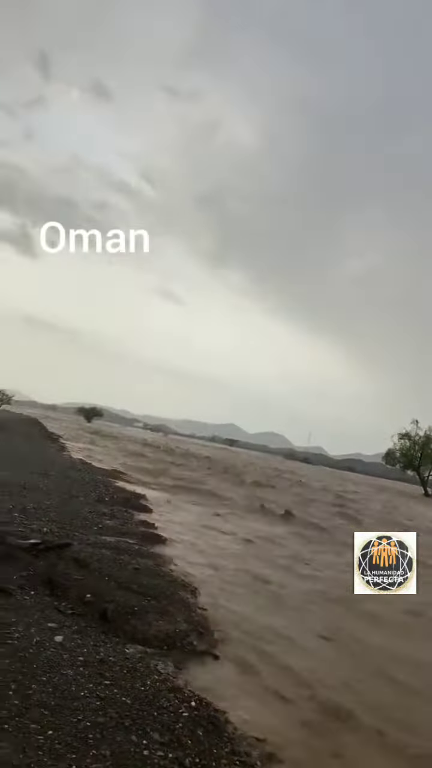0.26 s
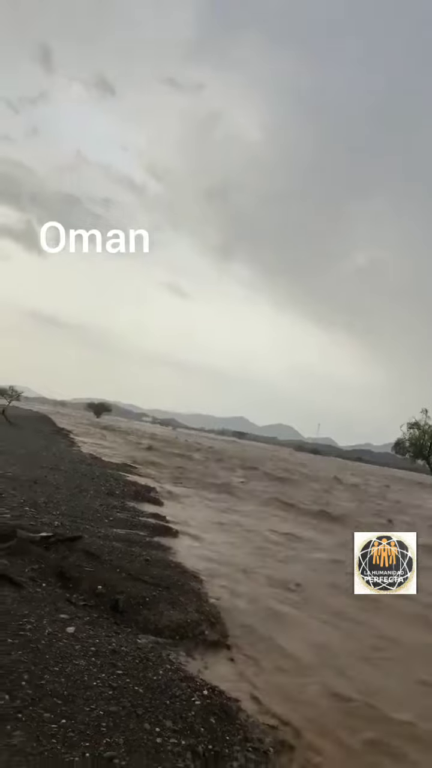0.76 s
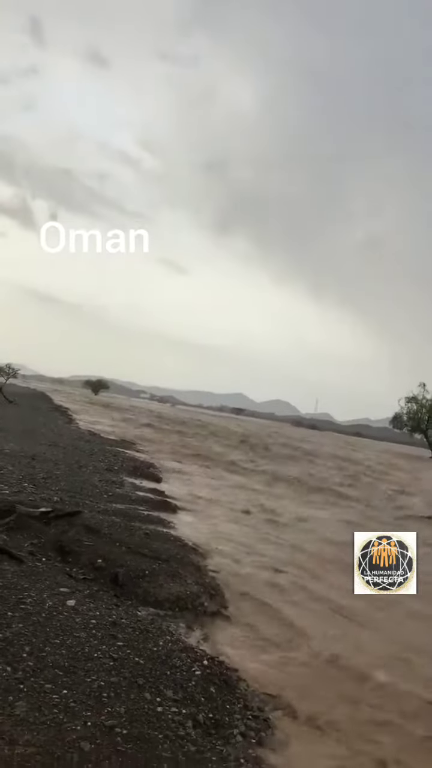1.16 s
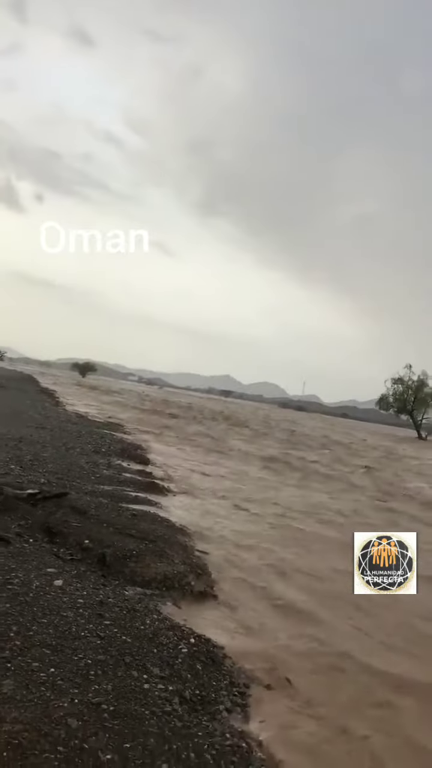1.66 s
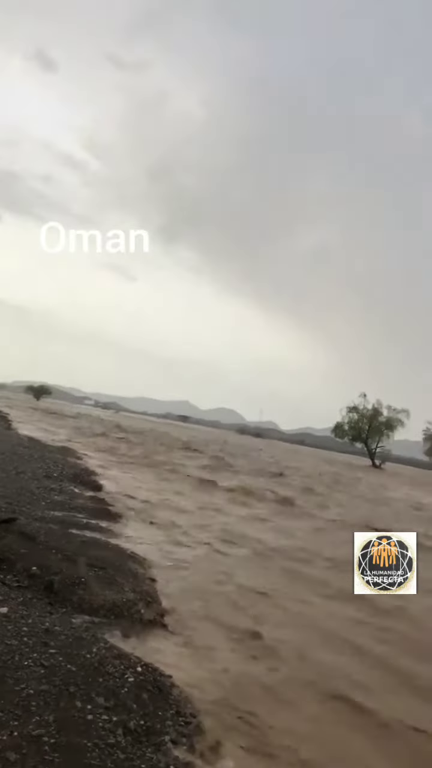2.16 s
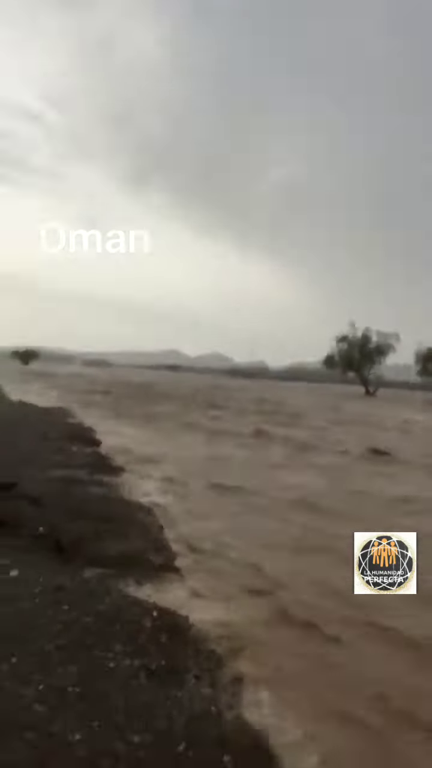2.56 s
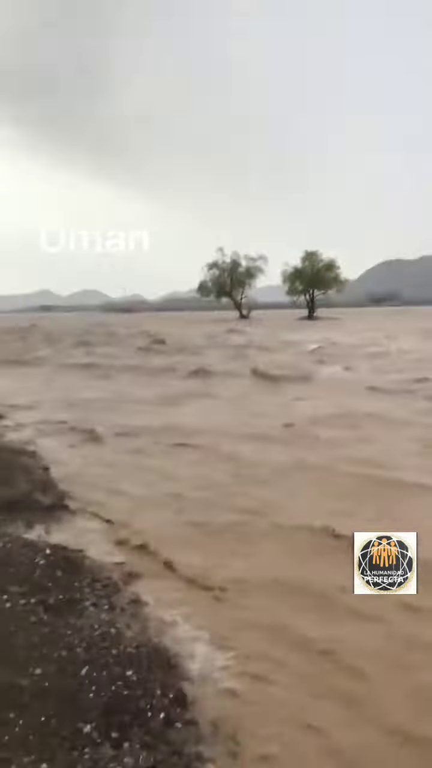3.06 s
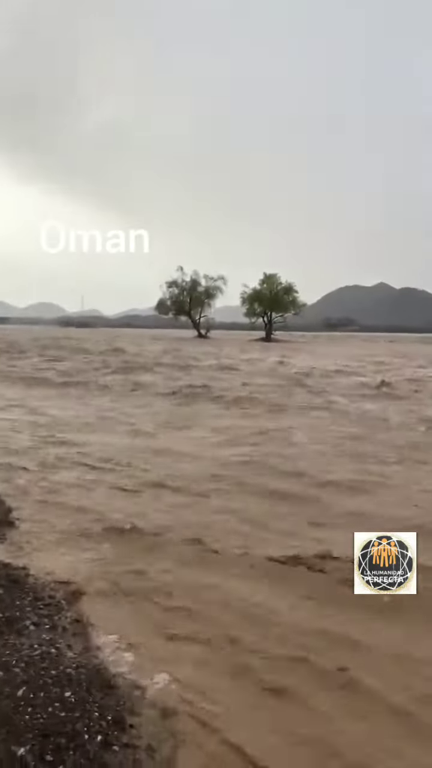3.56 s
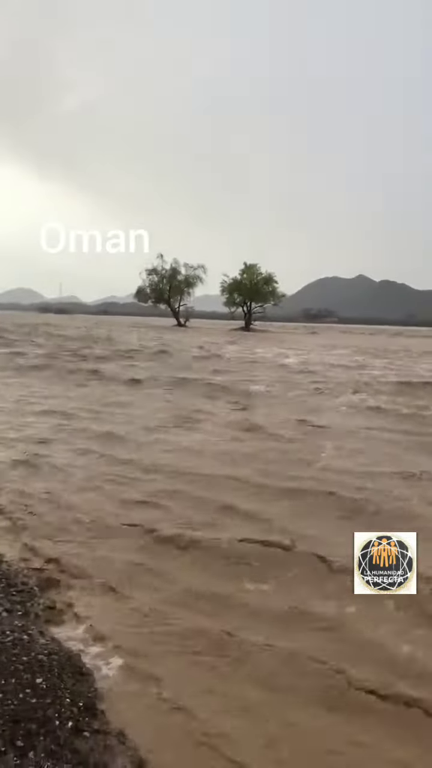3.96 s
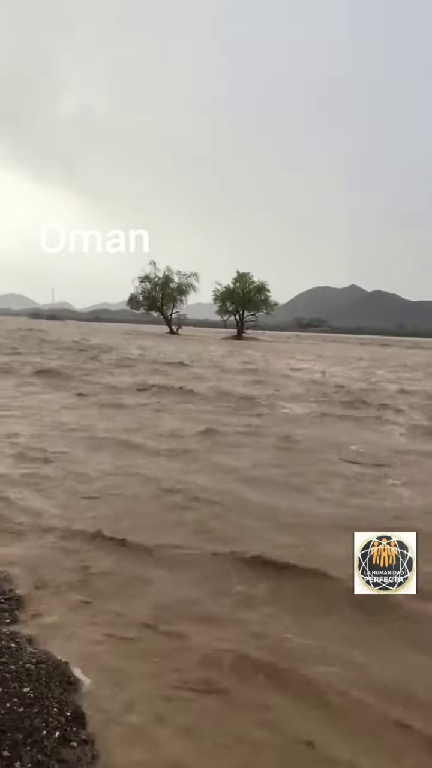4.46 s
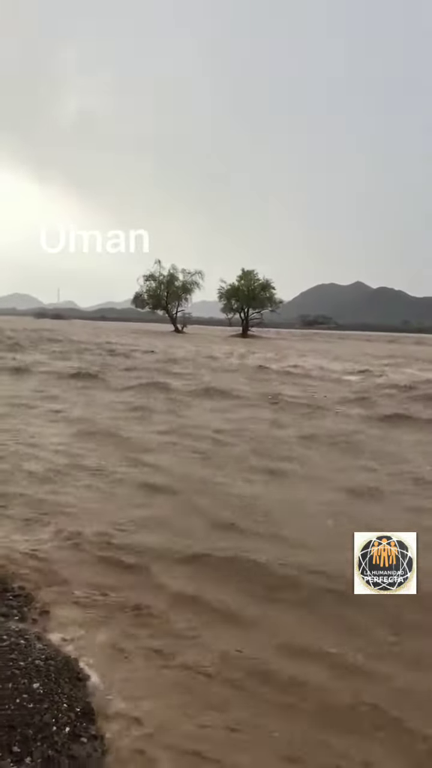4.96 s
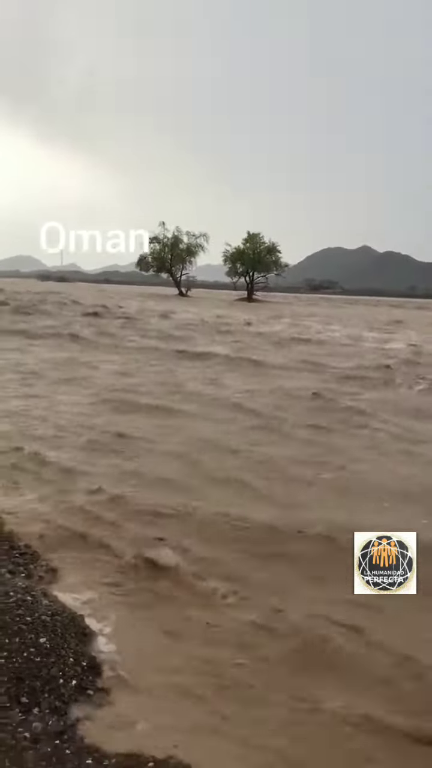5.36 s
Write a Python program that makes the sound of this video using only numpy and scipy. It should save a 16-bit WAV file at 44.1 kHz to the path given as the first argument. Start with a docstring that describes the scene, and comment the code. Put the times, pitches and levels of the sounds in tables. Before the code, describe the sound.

A flooded river rushes steadily from start to finish, heard from a phone on the gravel bank. Fine rain adds a soft, high hiss on the water and stones. For the first two seconds, gusts of wind buffet the microphone with a low rumble and a crackling flutter, strongest at the very start, at 0.5 seconds and around 1.5 seconds, before easing to a light breeze. Large raindrops hit the phone's case with short, sharp ticks and knocks at uneven intervals. They stand out at about 0.1, 0.2 and 1.3 seconds, then come in clusters near 2, 3 and 3.5 seconds and again between 4.7 and 5.4 seconds. A few drops land right on the microphone with a dull thud, loudest at about 3 and 4.7 seconds. The river and rain carry on until the end, at around 5.6 seconds.

```python
"""Gusts of wind and sharp taps of rain over a rushing, flooded river, heard from a phone on the bank.

The wind buffets the microphone for about two seconds, then eases to a breeze. Countless bursting bubbles
make the river's steady rush, and fine rain hisses on water and gravel. Drops hit the phone's case with
short ticks that fall in pitch, and a few land on the microphone opening with a thud."""
import sys
import numpy as np
from scipy import signal
from scipy.fft import rfft, irfft
from scipy.io import wavfile
from scipy.ndimage import uniform_filter1d

SR = 44100
rng = np.random.default_rng(int(sys.argv[2]) if len(sys.argv) > 2 else 0)


def dump(signal):
    """Clip the signal to [-1, 1] and save it as 16-bit WAV at the path in sys.argv[1]."""
    limited = np.clip(np.atleast_2d(signal).T, -1, 1)
    pcm = np.round(limited * 32767).astype(np.int16)
    wavfile.write(sys.argv[1], SR, pcm)


N = 247842
T = np.arange(N) / SR

# How strong the current, rain and wind are. Each row: time in seconds, relative level in dB.
CURRENT_LEVELS = [(2.3, -39), (4.58, -39), (4.81, -38.5), (5.62, -39)]
RAIN_LEVELS = [(0.0, -52), (0.87, -51.5), (1.31, -49.5), (2.83, -52.5), (5.62, -51.5)]
WIND_LEVELS = [(0.0, -27), (0.46, -38), (0.5, -26.5), (0.54, -37.5), (0.71, -36.5), (0.73, -30),
               (1.1, -35.5), (1.39, -27.5), (1.43, -34.5), (1.58, -29), (1.63, -27), (1.65, -40),
               (1.86, -35), (2.08, -37), (2.1, -36.5), (2.38, -38.5), (3.25, -42.5), (5.62, -41.5)]
# The tone of each noise. Each row: frequency in Hz, relative level in dB.
RIVER_TONE = [(150, -44), (300, -8.5), (420, -3), (560, 0.5), (680, 2), (820, -8), (1000, -18),
              (1250, -26.5), (1700, -18.5), (2100, -17), (2850, -18), (3300, -44), (4200, -33.5)]
RAIN_TONE = [(2000, -31), (3400, -5), (5000, -3), (6500, -1), (8500, 0.5), (10500, -0.5), (12500, -6),
             (15800, -12)]
RUMBLE_TONE = [(22, -27), (40, -6), (65, 3), (110, 0.5), (180, -3.5), (300, -10), (550, -23.5),
               (1000, -20.5), (2000, -65)]
FLUTTER_TONE = [(90, -21), (170, 7.5), (350, 1.5), (700, 1), (1000, -2.5), (1400, -9.5), (2000, -16.5),
                (3000, -34), (4000, -77)]
# Drops and swirls of air slapping the microphone opening.
# Each row: start in seconds, level in dB, starting pitch in Hz, fade time in seconds.
MIC_SLAPS = [(.234, -26, 390, 0.026), (.495, -16, 302, .009), (1.351, -17, 300, 0.012),
             (1.567, -21, 237, 0.029), (1.84, -20.5, 259, .008), (2.145, -15, 525, .021),
             (2.545, -20.5, 300, 0.0034), (2.9688, -7.5, 576, .019), (4.6568, -9, 387, 0.018)]
# Drops splashing on nearby water and gravel. Each row: start in seconds, level in dB.
NEAR_SPLASHES = [(.3957, -29.5), (.6009, -24), (1.175, -22), (3.27, -29)]
# The high notes the case rings at. Each row: pitch in Hz, level in dB, swell and fade time in seconds.
CASE_NOTES = [(966, -9, 0.002), (1576, -4.5, 0.00062), (2080, -4, 0.00063), (2714, -7.5, 0.00076)]
# Large drops on the case. Each row: start in seconds, level of the low body ring in dB, level of the
# tick in dB, brightness of the tick in dB per octave, place along the case from 0 to 1.
LARGE_DROPS = [(.0923, -13.5, -13, -1, .23), (.1014, -3, -13.5, -2, 0.28), (.2324, -11, -0.5, 1, 0.4),
               (.421, -26.5, -38, 5, 0.5), (.6009, -55, -20, 8, 0.26), (.772, -26, -30, 5, .38),
               (1.2274, -25.5, -29, 10, .38), (1.3052, -16.5, -2.5, 1.5, .4), (1.426, -21, -40, -3, .3),
               (1.4962, -24, -54, -3, .3), (1.8554, -41, -22.5, 2, .38), (1.902, -17.5, -16, -4, 0.42),
               (2.0248, -27, -24.5, -6, .4), (2.1265, -15.5, -17.5, 8, 0.43), (2.144, -9.5, -31, 0, 0.14),
               (2.1505, -19, -38, 1, 0.6), (2.287, -30, -36, -2, 0.2), (2.489, -47, -25.5, 6, 0.21),
               (2.8537, -8.5, -9.5, -3, 0.18), (2.9683, -40, -15, 9, 0.14), (2.973, -18, -16, 4, 0.24),
               (3.0365, -23.5, -20, 10, 0.29), (3.0731, -15.5, -12, 6, .18), (3.5115, -21.5, -28, 8, 0.46),
               (3.5217, -25, -26, -6, 0.23), (3.5709, -12.5, -17, 16.5, .37), (3.6176, -21, -21, 20, .5),
               (4.0512, -20.5, -27.5, 1, .38), (4.6564, -20, -30, -14, .5), (4.679, -17.5, -19, -1, 0.17),
               (4.84, -18, -38, 9, .36), (4.9722, -35, -19, 11, 0.26), (4.9878, -5.5, -10, 2, 0.42),
               (5.3253, -28, -25, 8, 0.42), (5.354, -28.5, -35, 5, .36), (5.3761, -34, -16.5, 10, 0.37)]


def undb(db):
    """Turn decibels into a number to multiply a sound by."""
    return 10 ** (np.asarray(db) / 20)


def unit(x):
    """Scale a signal so its average strength (rms) is 1."""
    return x / np.sqrt(np.mean(x ** 2))


def curve(rows):
    """Join (seconds, value) rows with straight lines."""
    return np.interp(T, *np.transpose(rows))


def colour(x, tone):
    """Shape a sound with a tone table, fading beyond the table's ends; the result has strength 1."""
    hz, db = np.transpose(tone)
    f = np.maximum(np.arange(N // 2 + 1) * SR / N, 1)
    edge_fade = np.minimum(f / hz[0], 1) ** 2 * np.minimum(hz[-1] / f, 1) ** 2
    gain = undb(np.interp(np.log(f), np.log(hz), db))
    return unit(irfft(rfft(x) * edge_fade * gain, N))


def band(x, low_hz, high_hz):
    """Keep mainly the sound between two frequencies."""
    return signal.sosfilt(signal.butter(2, [low_hz, high_hz], "band", fs=SR, output="sos"), x)


def wander(rate):
    """A smooth random wobble of strength 1 that picks a new value `rate` times a second."""
    steps = rng.standard_normal(4096)[(T * rate).astype(int) % 4096]
    width = int(SR / rate)
    return unit(uniform_filter1d(uniform_filter1d(steps, width), width))


def patter(rate, spread_db):
    """About `rate` random clicks a second, many small and a few large."""
    hit = rng.random(N) < rate / SR
    size = undb(spread_db * np.minimum(rng.exponential(size=N), 5))
    return unit(hit * size * rng.choice([-1, 1], N))


def glide(t, start_hz, end_hz, glide_s):
    """A pure tone that slides from one pitch toward another."""
    hz = end_hz + (start_hz - end_hz) * np.exp(-t / glide_s)
    return np.sin(2 * np.pi * np.cumsum(hz) / SR)


def chirp(start_hz, end_hz, glide_s, swell_s):
    """A ring that swells, fades and falls in pitch: high vibrations arrive before low ones."""
    t = np.arange(SR // 30) / SR
    return t / swell_s * np.exp(1 - t / swell_s) * glide(t, start_hz, end_hz, glide_s)


def add(out, start, sound):
    """Mix a sound into `out` at `start` seconds."""
    i = int(start * SR)
    out[i:i + len(sound)] += sound[:N - i]


def river():
    """Countless bursting bubbles merge into a rush that surges gently with the current."""
    bubbles = rng.standard_normal(N) + 0.44 * patter(rate=1800, spread_db=5)
    level_db = curve(CURRENT_LEVELS) + 2 + 0.94 * wander(rate=10)
    return colour(bubbles, RIVER_TONE) * undb(level_db)


def rain():
    """Fine drops on water and gravel: a distant hiss, and nearer specks that each have their own pitch."""
    hiss = colour(rng.standard_normal(N) + 0.38 * patter(rate=2600, spread_db=10), RAIN_TONE)
    specks = np.zeros(N)
    t = np.arange(SR // 200) / SR
    for when, pitch, faintness in rng.random(size=(700, 3)):
        hz = 4500 + 9000 * pitch
        ping = np.sin(2 * np.pi * hz * t) * np.exp(-t / 0.00095)
        add(specks, when * N / SR, (faintness + 0.045) ** -0.6 * ping)
    level_db = curve(RAIN_LEVELS) + 0.43 + 0.55 * wander(rate=8.8)
    return (hiss + undb(-13.5) * colour(specks, RAIN_TONE)) * undb(level_db)


def wind():
    """Swirling air rumbles on the microphone; strong gusts break into a brighter, crackling flutter."""
    gust_db = curve(WIND_LEVELS)
    rumble = colour(rng.standard_normal(N), RUMBLE_TONE) * undb(gust_db - 0.5 + 2 * wander(rate=55))
    # the flutter follows the wind more slowly and stops growing at a full gust
    slow_gust_db = uniform_filter1d(gust_db, int(0.2 * SR))
    full_gust_db = -34.5
    flutter_db = -35 + 2.63 * np.minimum(slow_gust_db - full_gust_db, 0)
    swirls = rng.standard_normal(N) + 0.88 * patter(rate=240, spread_db=3.5)
    flutter = colour(swirls, FLUTTER_TONE) * undb(flutter_db + 3.3 * wander(rate=45))
    return rumble + flutter


def thuds():
    """Water spreads over the microphone opening, so its ring sinks into the bass over a brief slosh."""
    out = np.zeros(N)
    t = np.arange(SR // 6) / SR
    fade_in = 1 - np.exp(-t / 0.00037)
    for start, db, hz, fade_s in MIC_SLAPS:
        slap = glide(t, start_hz=hz, end_hz=60.7, glide_s=0.00463) * np.exp(-t / fade_s)
        slosh = unit(band(rng.standard_normal(len(t)), low_hz=60, high_hz=463)) * np.exp(-t / 0.024)
        add(out, start, undb(db) * fade_in * (slap + undb(-14) * slosh))
    return out


def spray():
    """A sharp crack that falls in pitch at the very start of a hit, and a very short fizz of droplets."""
    crack = chirp(start_hz=9100, end_hz=4400, glide_s=0.00005, swell_s=0.00005)
    t = np.arange(len(crack)) / SR
    fizz = rng.standard_normal(len(t)) * np.exp(-t / 0.00034)
    return crack + undb(3.5) * fizz


def case_knock(body_db, tick_db, bright_db, place, body_hz):
    """One drop hits the case: a tick of high notes, the falling ring of the body and a dull push."""
    body = chirp(start_hz=1542, end_hz=body_hz, glide_s=0.0012, swell_s=0.0017)
    push = chirp(start_hz=360, end_hz=267, glide_s=0.0052, swell_s=0.001)
    lag_s = 0.00047  # the body's slow wave arrives after the tick
    knock = np.roll(undb(body_db) * (body + undb(-13.5) * push), int(lag_s * SR))
    for number, (hz, db, swell_s) in enumerate(CASE_NOTES, 1):
        # a harder hit favours the high notes
        gain = undb(tick_db + db + bright_db * np.log2(hz / 2200))
        # each note has still spots on the case, where a hit cannot sound it
        movement = abs(np.sin(np.pi * number * place))
        knock += gain * movement * chirp(1.27 * hz, hz, swell_s, swell_s)
    return knock


def drops():
    """Large drops and a sprinkle of small ones knock on the case and shatter; a few splash nearby."""
    knocks, sprays = np.zeros(N), np.zeros(N)
    for start, body_db, tick_db, bright_db, place in LARGE_DROPS:
        # the heavier the drop, the lower the body's pitch settles
        knock = case_knock(body_db, tick_db, bright_db, place, body_hz=551 - 2 * body_db)
        add(knocks, start, knock)
        # a piece of the drop lands again a moment later
        add(knocks, start + 0.00293 + 0.0051 * rng.random(), undb(-25) * knock)
        # fast, hard drops throw more spray
        spray_db = -9 + 2.06 * tick_db + 0.84 * bright_db
        add(sprays, start, undb(spray_db) * spray())
    for start, db in NEAR_SPLASHES:
        add(sprays, start, undb(db) * spray())
    for when, weight, hardness, place, pitch, wetness in rng.random(size=(50, 6)):
        start = when * N / SR
        small = case_knock(body_db=-47.5, tick_db=-39, bright_db=13 * hardness - 9.5,
                           place=place, body_hz=550 + 400 * pitch)
        # the fourth power keeps most small drops faint and lets a few stand out
        add(knocks, start, undb(6 * weight ** 4) * small)
        add(sprays, start, undb(-52 + 6 * wetness ** 4) * spray())
    # the knocks lose almost everything above the case's top note; the crack and fizz sound mainly between about
    # 3.8 and 9.5 kHz
    case_filter = signal.butter(12, 3550, fs=SR, output="sos")
    return signal.sosfiltfilt(case_filter, knocks) + band(sprays, low_hz=3840, high_hz=9500)


def scene():
    """River, rain and wind around the phone, plus the drops that hit it, in one channel."""
    return (river() + rain() + wind() + drops() + thuds())[None]


def record(dry):
    """The phone rounds off the loudest peaks and cuts the highest treble."""
    rounded = np.tanh(0.9 * dry) / 0.9
    top_hz = 15750
    return signal.sosfilt(signal.ellip(10, 0.2, 70, top_hz, fs=SR, output="sos"), rounded)


dry = scene()
out = record(dry)
dump(out)
```